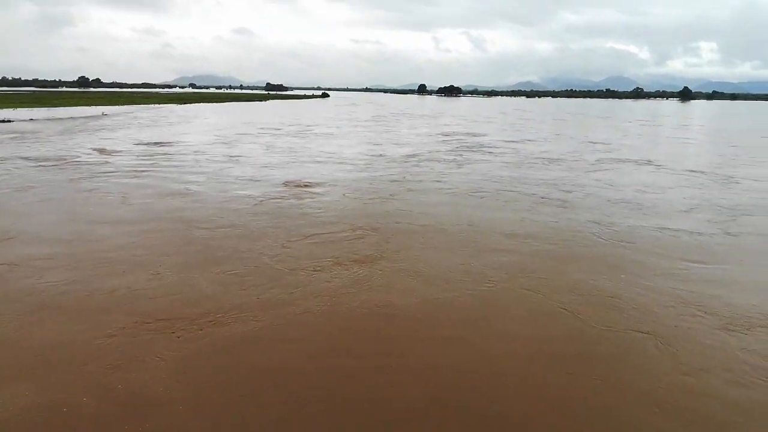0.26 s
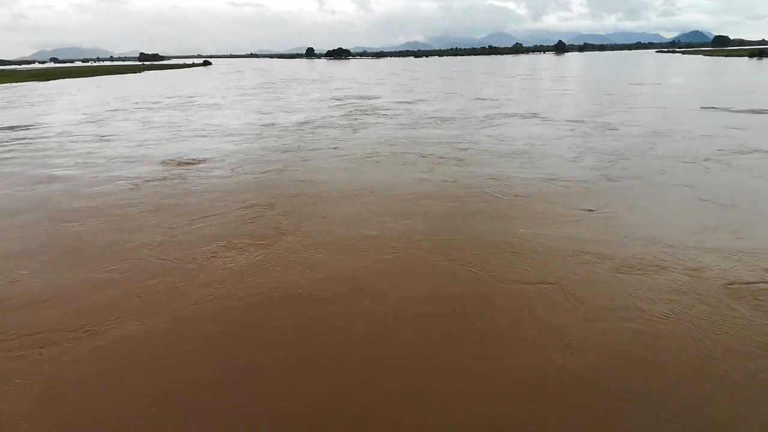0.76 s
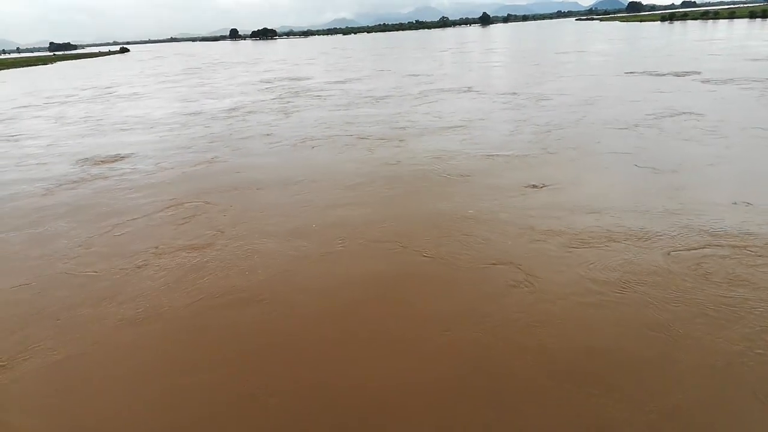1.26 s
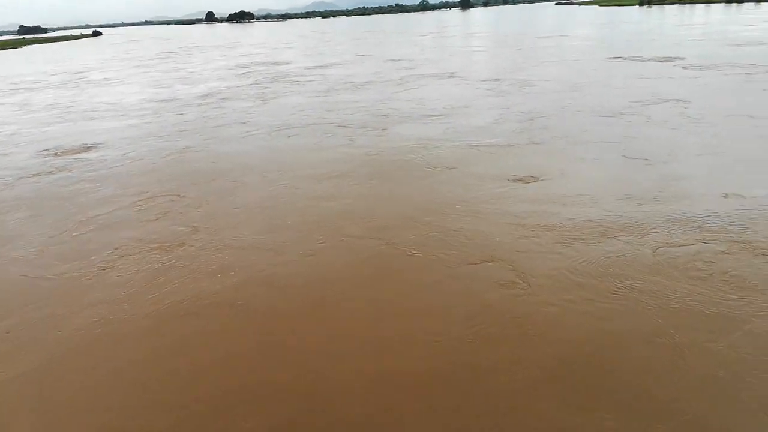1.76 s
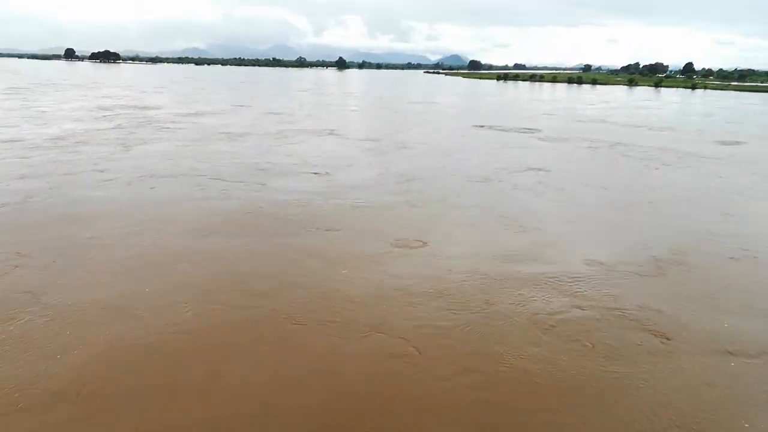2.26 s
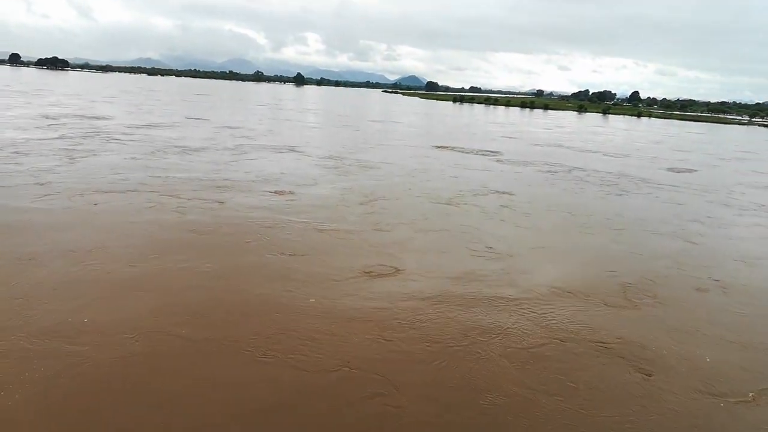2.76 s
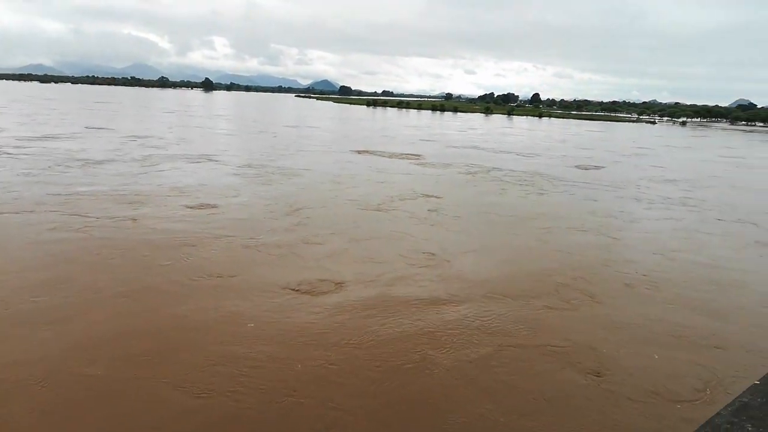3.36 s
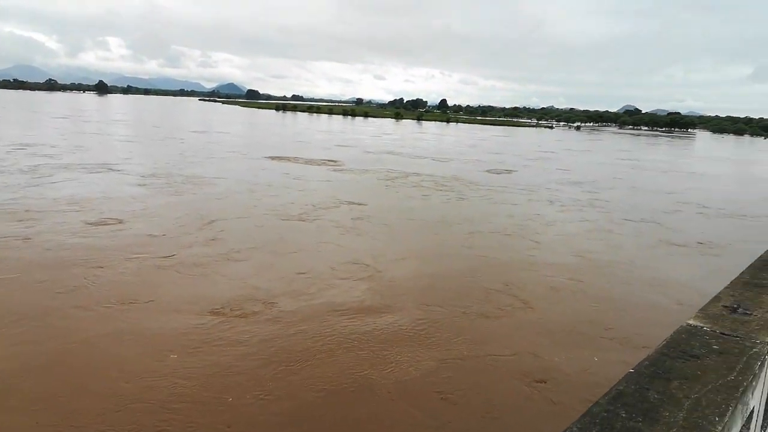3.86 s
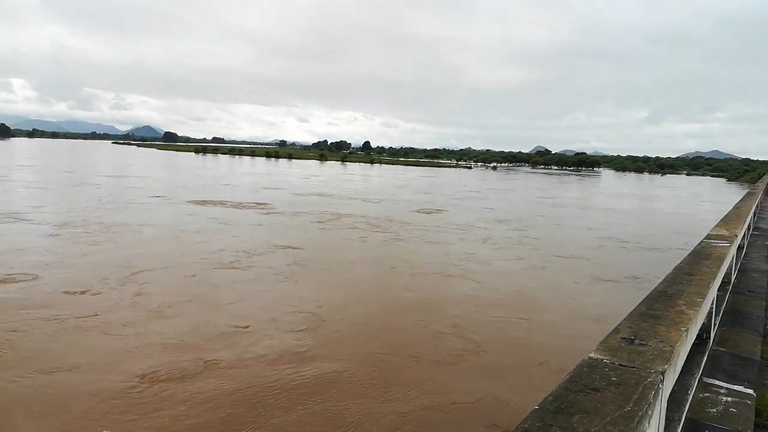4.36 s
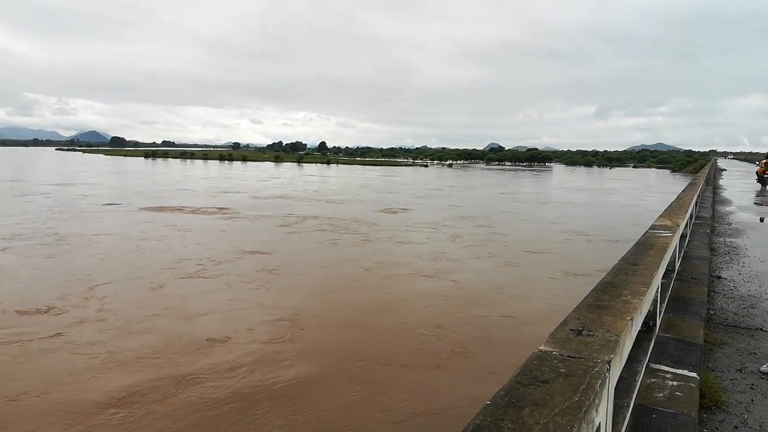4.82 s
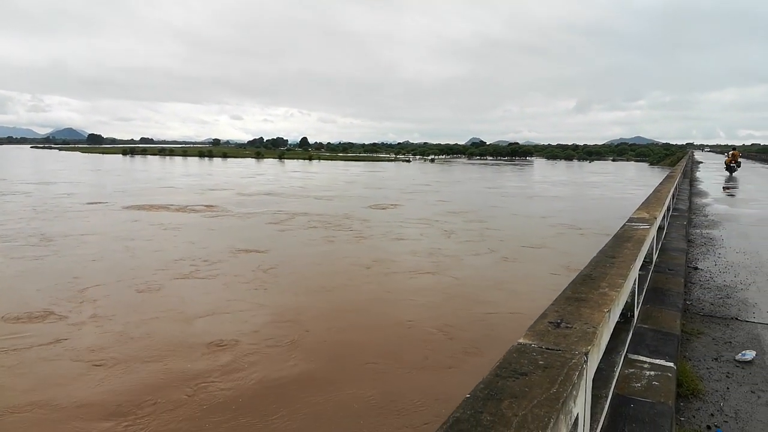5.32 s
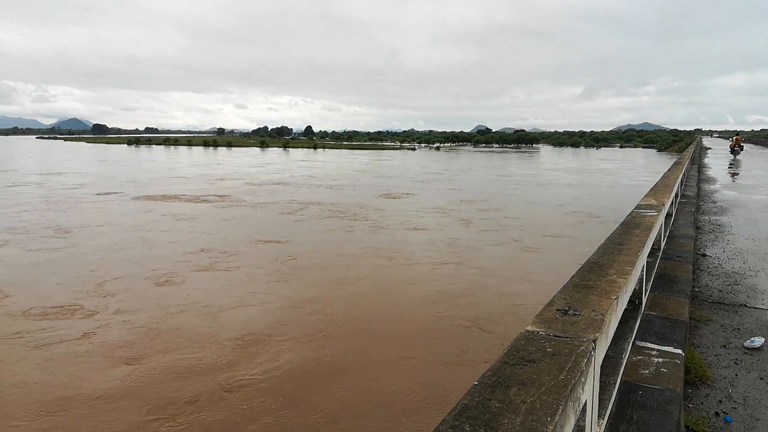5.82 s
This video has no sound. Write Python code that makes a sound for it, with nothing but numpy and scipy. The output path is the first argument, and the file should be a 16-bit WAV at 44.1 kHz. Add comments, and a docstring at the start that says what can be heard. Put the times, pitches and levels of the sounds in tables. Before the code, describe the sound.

For about six seconds, a flooded river makes a steady, broad rush with faint droplet crackle in open air below a bridge. Wind rumbles low on the microphone, thumping right at the start, around 0.7 and most strongly at 2.0-2.8, then easing into scattered small buffets. From 0 a low engine putters at about 27 beats a second, loud until 0.9, dipping near 1.3, rising again at 2.0 and fading after 2.5. Wet tyres hiss and crackle, with sharp spits of water at 0.5-0.9, 1.2-1.3 and 2.1; passing tyre roar peaks around 1.95-2.2 with a fuzzy singing note that drops in pitch. From 2.5 to 4.2 a smoother engine drones low near 95 hertz, sinking slightly and fading away. Weak splashes and mist linger at 3.3-5.0. River and light wind remain, with a soft leftward swish at 5.7.

```python
"""A flooded river rushes under a road bridge, wind buffets the microphone and an engine putters.
River, wind, tyre roar and spray are coloured noise; droplets make the water crackle.
The putter is a pulse train ringing a silencer; wet tyres hiss, sing a fuzzy note and throw spatter.
A second, smoother engine, built from sines, hums briefly as it moves away; a soft swish comes last."""
import sys
import numpy as np
from scipy import signal
from scipy.fft import rfft, irfft, next_fast_len
from scipy.io import wavfile
from scipy.ndimage import uniform_filter1d, map_coordinates

SR = 44100
rng = np.random.default_rng(int(sys.argv[2]) if len(sys.argv) > 2 else 0)


def master_out(mix):
    """Clip the mix to full scale and print it as 16-bit PCM to the path in sys.argv[1]."""
    frames = np.transpose(np.atleast_2d(mix))
    ceiling = np.clip(frames, -1, 1)
    pcm = np.round(ceiling * 32767).astype(np.int16)
    wavfile.write(sys.argv[1], SR, pcm)


N = 268391  # length in samples


def amp(db):
    """Decibels to gain."""
    return 10 ** (np.asarray(db) / 20)


def unit(x):
    """Scale to rms 1."""
    return x / np.sqrt(np.mean(x ** 2) + 1e-20)


def along(points, hz):
    """Interpolate (f/Hz, value) points on a log-frequency axis."""
    f, value = np.transpose(points)
    return np.interp(np.log(hz + 1), np.log(f + 1), value)


def curves(rows):
    """One value per sample for each column after the time."""
    times, *columns = np.transpose(rows)
    t = np.arange(N) / SR
    return [np.interp(t, times, column) for column in columns]


def wobble(rate):
    """A smooth random curve with rate knots a second."""
    knots = rng.standard_normal(int(N * rate / SR) + 4)
    return map_coordinates(knots, [np.arange(N) * rate / SR])


def filtered(x, response):
    """Shape x by a response of frequency in Hz."""
    size = next_fast_len(N + SR // 2)  # padding lets the tail ring out
    spectrum = rfft(x, size) * response(np.fft.rfftfreq(size, 1 / SR))
    return irfft(spectrum, size)[..., :N]


def swell(s, half):
    """A bell-shaped rise and fall around time s, down to 46 % half a length away."""
    t = np.arange(N) / SR
    return np.exp(-.5 * ((t - s) / (.8 * half)) ** 2)


def nearness(s, before, after):
    """Closest distance over present distance for something that passes at time s."""
    age = np.arange(N) / SR - s
    return 1 / np.hypot(1, age / np.where(age < 0, before, after))


def bearing(s, passing):
    """From -1 while approaching to 1 while leaving."""
    age = np.arange(N) / SR - s
    return age / passing * nearness(s, passing, passing)


def together(gains):
    """Unrelated sounds add in power."""
    return np.sqrt(sum(g ** 2 for g in gains))


def turbulence(patchy_db):
    """Two unrelated noises whose gain varies in random patches of time and frequency."""
    z = signal.stft(rng.standard_normal((2, N)), nperseg=512)[2]
    field = rng.standard_normal(z.shape)
    field = uniform_filter1d(field, 7, 1)  # smooth across frequency
    field = uniform_filter1d(field, 10, 2)  # smooth across time
    noise = signal.istft(z * amp(patchy_db * unit(field)), nperseg=512)[1]
    return unit(noise[:, :N])


def droplets(rate, spread_db, life):
    """Random noise bursts, rate a second, dying over life seconds: a few large among many small."""
    size = np.minimum(rng.exponential(size=N), 3.3)  # cap the largest drops
    strikes = (rng.random(N) < rate / SR) * amp(spread_db * size)
    energy = signal.lfilter([1], [1, -np.exp(-2 / (life * SR))], strikes ** 2)
    return unit(np.sqrt(energy) * rng.standard_normal((2, N)))


# how alike the two microphone ports hear: f/Hz, likeness (limited to -0.9..0.99 in use)
PORT_LIKENESS = [(50, 1.4), (130, 0.58), (200, .5), (290, -0.18), (640, -0.62), (1400, -0.1), (3000, 0),
                 (15000, 0)]
# tilt between the ports: f/Hz, left minus right level/dB, before each sound's own lean
PORT_LEAN = [(100, 0.5), (350, -4.5), (1300, -2.5), (2400, -2.5), (4400, -7.5), (7000, -13), (9000, -8),
             (14000, -2.5)]


def at_ports(pair, spectrum, lean_db=0):
    """Colour two noises and mix them into left and right; their mean has rms 1."""
    def ports(hz):
        """A 2 by 2 mix at each frequency: shared and opposed noise into each port."""
        alike = np.clip(along(PORT_LIKENESS, hz), -.9, .99)
        left = amp(along(PORT_LEAN, hz) + lean_db)
        same, opposite = np.sqrt(1 + alike), np.sqrt(1 - alike)
        # hold the colour of the left-right mean, whatever the lean and likeness
        colour = amp(along(spectrum, hz)) / np.sqrt(1 + left ** 2 + 2 * alike * left)
        return colour * np.array([[left * same, left * opposite], [same, -opposite]])
    out = filtered(pair, ports).sum(1)
    return out / np.std(out.mean(0))


# colour of the rushing water: f/Hz, relative level/dB
RIVER_COLOUR = [(150, -12), (300, -6.5), (450, -28), (600, -22.5), (850, -15.5), (1150, -15.5), (1450, -20),
                (1850, -24.5), (2400, -25.5), (3100, -20), (5600, -23), (6900, -15), (8300, -21),
                (10500, -34.5), (15500, -61)]


def river():
    """The broad steady rush of the flood: turbulent noise with a little droplet crackle."""
    water = turbulence(patchy_db=0.5) + 0.27 * droplets(rate=400, spread_db=6.5, life=0.0025)
    level_db = -47.5 + 0.83 * wobble(2.54)
    return amp(level_db) * at_ports(water, RIVER_COLOUR, lean_db=6)


# light breeze between swells: t/s, buffet level/dB, flutter relative level/dB
BREEZE_LEVELS = [(0, -39, -47), (1.3, -34.5, -50), (2.2, -31, -45.5), (3.3, -39, -43), (4.6, -38.5, -43.5),
                 (6.09, -41, -45.5)]
# swells of wind: t/s, half-length/s, buffet level/dB, flutter relative level/dB
WIND_SWELLS = [(0.186, 0.037, -36, -58), (0.676, 0.16, -26.5, -37), (1.23, .07, -38, -79),
               (1.66, 0.13, -37, -39.5), (2.012, 0.13, -30.5, -52), (2.273, 0.055, -23.5, -42),
               (2.414, 0.23, -28, -35), (2.787, 0.07, -30, -40.5), (3.066, 0.15, -32, -36),
               (3.48, 0.046, -33.5, -52), (4.404, 0.053, -34.5, -47), (4.952, 0.044, -29, -44.5),
               (5.88, 0.068, -43, -44.5)]
# sharp gusts: t/s, relative peak level/dB
SHARP_GUSTS = [(.003, -17.5), (0.019, -19), (0.044, -18), (.102, -24), (0.65, -21.5), (2.531, -17)]
# colours of large eddies, small eddies and gusts: f/Hz, relative level/dB
BUFFET_COLOUR = [(10, -30), (22, -6), (40, -6.5), (62, -3), (95, -1.5), (130, -7.5), (200, -18.5),
                 (320, -46), (600, -85)]
FLUTTER_COLOUR = [(60, -42), (105, 3), (145, 1.5), (190, 1), (250, -5), (330, -9), (450, -21), (650, -30.5),
                  (1500, -75)]
PUFF_COLOUR = [(100, -10), (250, 0), (420, 0), (600, -8), (850, -13), (1300, -23), (2800, -45)]


def wind():
    """Swells ride on a breeze: large eddies buffet low, small ones flutter higher, sharp gusts thump."""
    t = np.arange(N) / SR
    buffet_db, flutter_db = curves(BREEZE_LEVELS)
    push = together([amp(buffet_db)] + [amp(db) * swell(s, half) for s, half, db, _ in WIND_SWELLS])
    shake = together([amp(flutter_db)] + [amp(db) * swell(s, half) for s, half, _, db in WIND_SWELLS])
    buffet = push * amp(0.56 * wobble(23)) * at_ports(turbulence(patchy_db=1.0), BUFFET_COLOUR)
    flutter_noise = at_ports(turbulence(patchy_db=0.85), FLUTTER_COLOUR)
    flutter = shake * amp(6.5 + 1.4 * wobble(45)) * flutter_noise
    gust = sum(amp(db) * np.exp(-((t - s) / .01) ** 2) for s, db in SHARP_GUSTS)
    puff = at_ports(turbulence(patchy_db=1), PUFF_COLOUR)
    return buffet + flutter + amp(-13.5) * gust * puff


# pace of the puttering engine: t/s, firing rate f/Hz
FIRING_RATE = [(0, 26.9), (.4, 26.8), (.55, 26.6), (1, 26.6), (1.3, 26.3), (1.7, 27.2), (2, 27),
               (2.3, 26.5)]
# loudness of its exhaust: t/s, level/dB
EXHAUST_LEVEL = [(0, -29), (.45, -26.5), (.75, -26), (1.05, -30.5), (1.3, -34.5), (1.7, -33.5),
                 (2.05, -28.5), (2.5, -38), (6.1, -58)]


def putter():
    """Each firing is a short thud that swells and dies in the silencer's resonance."""
    rate, = curves(FIRING_RATE)
    level_db, = curves(EXHAUST_LEVEL)
    turns = np.floor(np.cumsum(rate) / SR + .41)  # steps up by one at each firing
    firings = np.diff(turns, prepend=turns[0]) * amp(.5 * wobble(27))

    def silencer(f, hz, width_hz):
        """One resonant chamber."""
        return 1j * f * width_hz / (hz ** 2 - f ** 2 + 1j * f * width_hz)

    def pipe(f):
        """The main chamber, with weaker resonances above and below it."""
        thud = silencer(f, 155, 112) ** 4
        above = amp(-25) * silencer(f, 348, 130) ** 3
        below = amp(-9.5) * silencer(f, 56, 45) ** 3
        return thud + above + below
    return amp(level_db) * unit(filtered(firings, pipe)) * amp([[.2], [-.2]])


# vehicles and axles rolling past: t/s when abreast, passing time/s, roar level/dB,
# left minus right level/dB (added to the swing and the roar's own lean)
ROAR_PASSES = [(.3, 0.16, -47.5, -3.5), (1.5, 0.19, -56.5, 11), (1.95, 0.078, -39, -8),
               (2.2, 0.09, -43, -5.5)]
# colour of tyre roar: f/Hz, relative level/dB
ROAR_COLOUR = [(250, 3.5), (500, 4.5), (800, 6), (1100, 5), (1550, 2.5), (2100, -1), (3500, -7.5),
               (7000, -53)]
CROSSING_DB = 5  # left minus right swings from plus to minus this
FAR_ROAR_DB, FAR_PAN_DB = -54, -5  # distant traffic: level, left minus right


def tyres():
    """Each roar swells with nearness and crosses from left to right, over distant traffic."""
    sides = np.array([[.5], [-.5]])
    roars = [amp(FAR_ROAR_DB + sides * FAR_PAN_DB)]
    for s, passing, db, pan_db in ROAR_PASSES:
        side_db = sides * (pan_db - CROSSING_DB * bearing(s, passing))
        roars.append(amp(db + side_db) * nearness(s, passing, passing))
    return together(roars) * at_ports(turbulence(patchy_db=2.0), ROAR_COLOUR, lean_db=6)


# plumes behind the vehicles: t/s, rise time/s, fall time/s,
# then mist, bright hiss, splash and fizz, each relative level/dB
SPRAY_PLUMES = [(1.3, 0.51, 0.5, -40.5, -43, -37, -60.5), (2.3, 0.34, 0.57, -35, -40, -40, -64.5)]
# surges of spray through puddles: t/s, half-length/s, relative level/dB, kind
SPRAY_SURGES = [(0.058, .1, -45.5, "splash"), (0.382, 0.26, -42.5, "bright"), (0.52, 0.15, -36, "mist"),
                (0.503, 0.044, -41.5, "splash"), (0.692, 0.084, -32, "mist"), (0.829, 0.098, -32.5, "mist"),
                (0.96, 0.24, -51.5, "fizz"), (1.026, 0.061, -34, "mist"), (1.325, 0.38, -37.5, "bright"),
                (1.577, 0.2, -32.5, "mist"), (2.145, 0.22, -35.5, "mist"), (2.19, .05, -61, "fizz"),
                (3.316, 0.043, -43, "splash"), (3.7, 0.54, -47, "splash"), (3.697, .14, -45.5, "mist"),
                (4.65, 0.062, -64, "fizz"), (4.7, 0.19, -49.5, "splash"), (5.0, .27, -66, "fizz"),
                (4.9, 0.17, -49.5, "mist")]
APPROACH_POWER, RECEDE_POWER = 1.37, 1.175  # spray fades as this power of distance


def thrown(kind, plume_dbs):
    """Strength of one kind of spray: the passing plumes and the surges on them."""
    t = np.arange(N) / SR
    gains = [amp(db) * swell(s, half) for s, half, db, name in SPRAY_SURGES if name == kind]
    for (s, rise, fall, *_), db in zip(SPRAY_PLUMES, plume_dbs):
        power = np.where(t < s, APPROACH_POWER, RECEDE_POWER)
        gains.append(amp(db) * nearness(s, rise, fall) ** power)
    return together(gains)


# colours of mist, bright hiss, coarse splash and fine fizz: f/Hz, relative level/dB
MIST_COLOUR = [(3500, -50), (5200, -10.5), (6100, 1), (6700, 5), (7300, 1), (7900, -3.5), (9000, -52),
               (10200, -52), (13000, -55)]
BRIGHT_COLOUR = [(3500, -42), (5200, -19), (6100, -5.5), (7000, -2), (8200, 0.5), (9300, -9.5),
                 (10200, -17), (13000, -29)]
SPLASH_COLOUR = [(1000, -53), (1900, -10.5), (2500, -3.5), (3100, 0), (3800, -2.5), (4600, 2), (5500, 0),
                 (7000, -3), (10000, -35)]
FIZZ_COLOUR = [(7000, -30), (9500, -8), (11300, 6), (13500, 3), (15700, -5)]


def spray():
    """Wet tread flings coarse splash, hissing mist and fine fizz, all full of droplets."""
    *_, mist_db, bright_db, splash_db, fizz_db = np.transpose(SPRAY_PLUMES)
    drops = droplets(rate=350, spread_db=7.0, life=0.0018)  # shared by mist and fizz
    surge_db = 0.86 * wobble(30.27)

    narrow = at_ports(turbulence(patchy_db=4.0) + 0.58 * drops, MIST_COLOUR)
    hiss = turbulence(patchy_db=4.0) + 0.99 * droplets(rate=540, spread_db=3.5, life=0.004)
    wide = at_ports(hiss, BRIGHT_COLOUR)
    mist = thrown("mist", mist_db) * narrow + thrown("bright", bright_db) * wide
    mist = amp(-2.5 + surge_db) * mist

    coarse = turbulence(patchy_db=2.5) + 0.66 * droplets(rate=260, spread_db=3.5, life=0.002)
    splash = thrown("splash", splash_db) * amp(-1.5 + surge_db) * at_ports(coarse, SPLASH_COLOUR)

    fine = turbulence(patchy_db=4) + 0.38 * drops
    fizz = thrown("fizz", fizz_db) * at_ports(fine, FIZZ_COLOUR)
    return mist + splash + fizz


# single spits of water: t/s, peak level/dB before panning, f/Hz of the colour's centre
WATER_SPITS = [(.501, -17, 6700), (.535, -20, 6800), (.635, -20, 6400), (.671, -18, 6750),
               (.742, -16, 6750), (.857, -18, 6800), (1.218, -15, 5500), (1.340, -12.5, 4700),
               (2.082, -19, 6850), (3.068, -21, 7100)]


def spits():
    """Larger drops burst close by, each a brief noise crack with its own pitch."""
    out, t = np.zeros((2, N)), np.arange(N) / SR
    for s, db, hz in WATER_SPITS:
        age = np.maximum(t - s, 0)
        decay = np.exp(-age / .002) + .1 * np.exp(-age / .01)  # crack, then faint tail
        burst = (1 - np.exp(-age / .0005)) * decay

        def colour(f):
            """A peak at the drop's pitch between soft low and steep high limits."""
            peak = 1 / np.hypot(1, np.log((f + 1) / hz) / .13)
            return peak / (1 + (f / 8800) ** 16) / (1 + (2300 / (f + 1)) ** 4)
        crack = filtered(burst * rng.standard_normal((2, N)), colour)
        out += amp(db) * crack / np.abs(crack).max()
    return out * amp([[-4], [5]])  # toward the right


# the tread sings out: t/s, passing time/s, note level/dB, octave level/dB, both before panning
TREAD_SINGS = [(1.7, 0.046, -50, -51), (2.22, 0.064, -41.5, -50), (2.7, 0.13, -52.5, -54.5)]
# a distant tread: t/s, half-length/s, f/Hz
DISTANT_TREAD = (3.4, .6, 1064)
TREAD_HZ, DOPPLER = 1074, .036  # middle pitch; share it sits above before and below after passing
DROP_AT_S, DROP_TIME_S = 2.0, .08  # when the pitch drops and how fast
FAR_NOTE_DB, FAR_OCTAVE_DB = -61, -57.5  # before panning


def tread():
    """The tread sings a fuzzy note and octave, dropping as it passes; a distant one holds its pitch."""
    def note(hz, blur):
        """A sine blurred by random sine and cosine gains, unrelated left and right."""
        angle = 2 * np.pi * np.cumsum(hz * np.ones(N)) / SR
        return np.array([unit(wobble(blur) * np.sin(angle) + wobble(blur) * np.cos(angle))
                         for _ in range(2)])
    hz = TREAD_HZ * (1 - DOPPLER * bearing(DROP_AT_S, DROP_TIME_S))
    low = together([amp(db) * nearness(s, passing, passing) for s, passing, db, _ in TREAD_SINGS])
    high = together([amp(db) * nearness(s, passing, passing) for s, passing, _, db in TREAD_SINGS])
    near = low * amp(0.86 * wobble(12)) * note(hz, 65) + high * note(2 * hz, 110)
    s, half, far_hz = DISTANT_TREAD
    far_notes = amp(FAR_NOTE_DB) * note(far_hz, 140) + amp(FAR_OCTAVE_DB) * note(2 * far_hz, 100)
    far = swell(s, half) * far_notes
    return near * amp([[-1.5], [2]]) + far * amp([[-6], [3.5]])


# the receding engine: t/s, f/Hz of the first order, relative level/dB
HUM_COURSE = [(2.3, 96.9, -66), (2.7, 95, -39.5), (3.1, 94, -39.5), (3.5, 93, -42), (3.85, 91.7, -39),
              (4.2, 89.9, -42), (6.1, 91.3, -83)]
# strength of its orders: multiple of the pitch, relative level/dB
ORDER_LEVELS = [(1, -5), (2, 0.5), (3, -23), (4, -12.5)]


def hum():
    """A smoother engine drones on a few low orders, its pitch and their strengths wavering."""
    hz, level_db = curves(HUM_COURSE)
    phase = 2 * np.pi * np.cumsum(hz * (1 + 0.00866 * wobble(18))) / SR
    tone = sum(amp(db + 2 * wobble(10)) * np.sin(k * phase) for k, db in ORDER_LEVELS)
    return amp(level_db - 5.5) * unit(tone)


# the soft swish: t/s, half-length/s, level/dB
SOFT_SWISH = (5.69, 0.12, -49)


def swish():
    """A brief soft swish of noise, a little to the left."""
    s, half, db = SOFT_SWISH
    # f/Hz, relative level/dB
    colour = [(1200, -27), (2100, -4), (2550, 7), (3200, 1), (4500, 2), (8000, -34)]
    return amp(db) * swell(s, half) * at_ports(turbulence(patchy_db=0), colour, lean_db=7)


def scene():
    """River, wind and traffic in the open air."""
    steady = river() + wind()
    traffic = putter() + tyres() + tread() + hum()
    water = spray() + spits() + swish()
    return steady + traffic + water


def record(dry):
    """Keep nothing above the band limit of 15780 Hz."""
    return filtered(dry, lambda hz: hz < 15780)


dry = scene()
out = record(dry)
master_out(out)
```